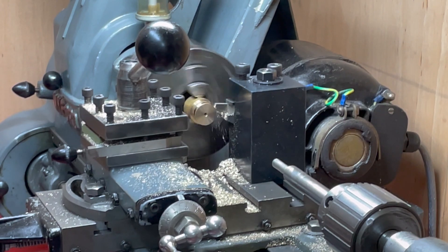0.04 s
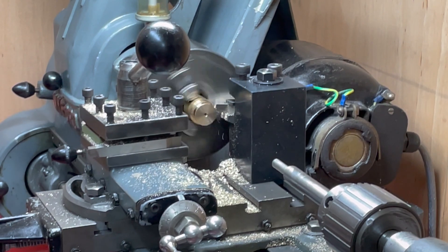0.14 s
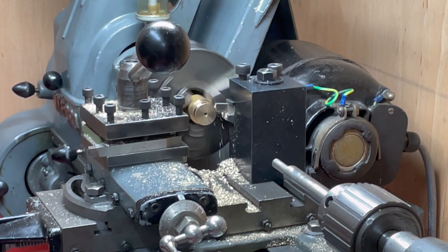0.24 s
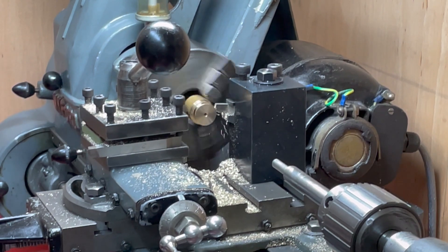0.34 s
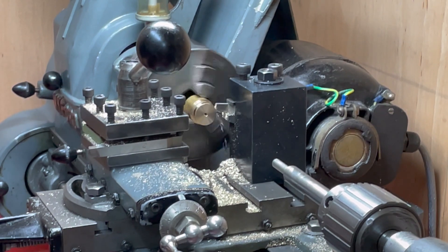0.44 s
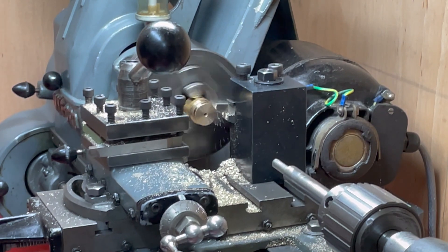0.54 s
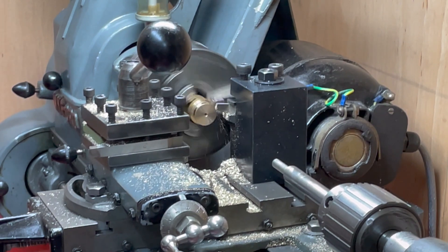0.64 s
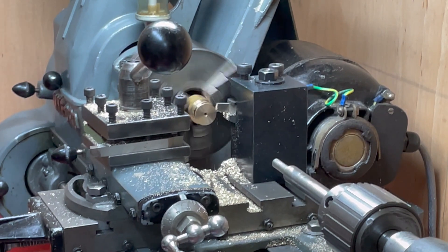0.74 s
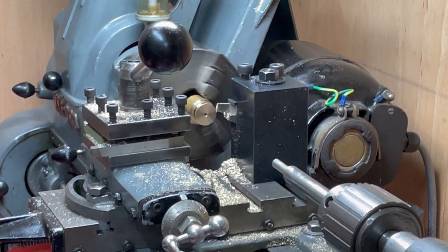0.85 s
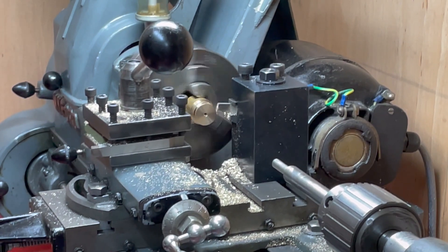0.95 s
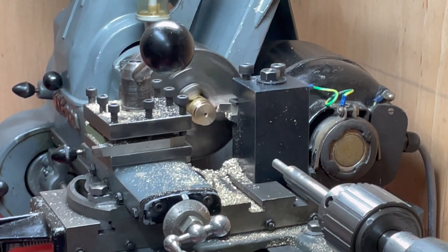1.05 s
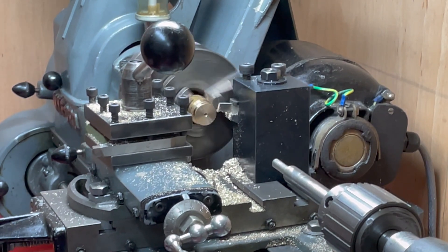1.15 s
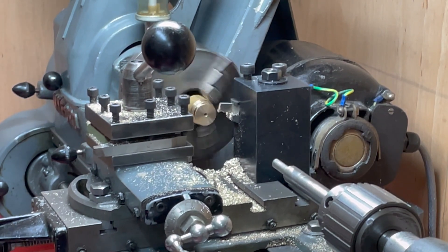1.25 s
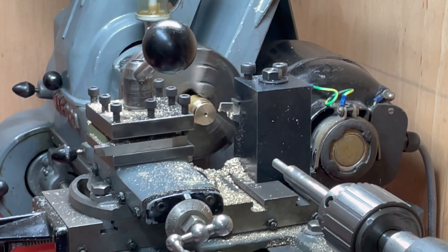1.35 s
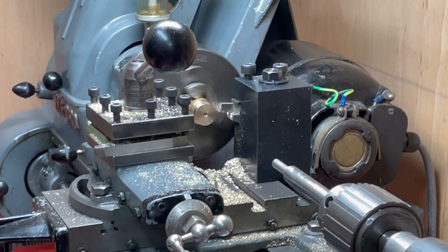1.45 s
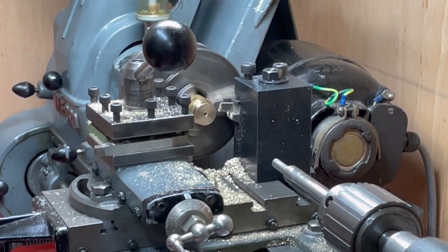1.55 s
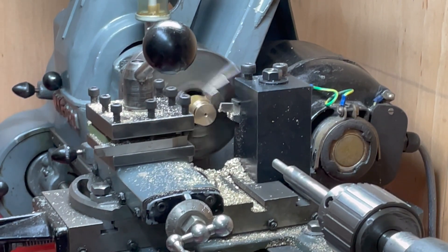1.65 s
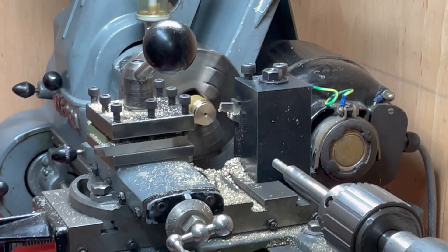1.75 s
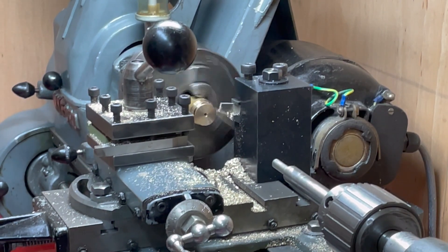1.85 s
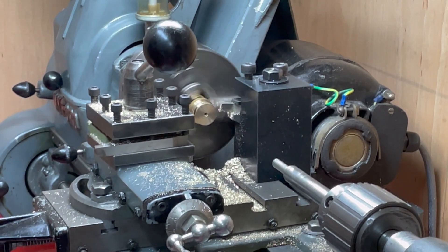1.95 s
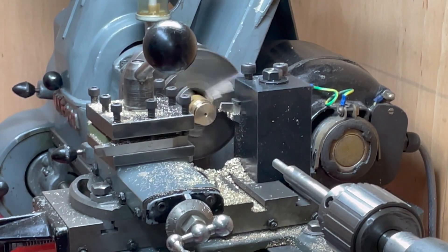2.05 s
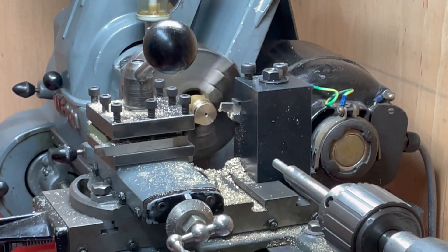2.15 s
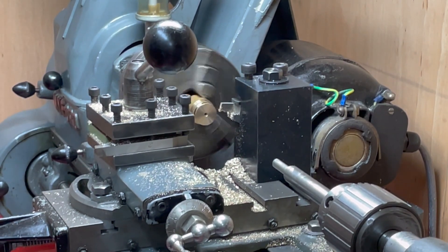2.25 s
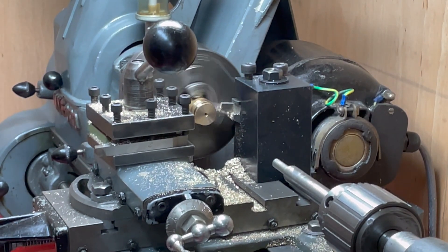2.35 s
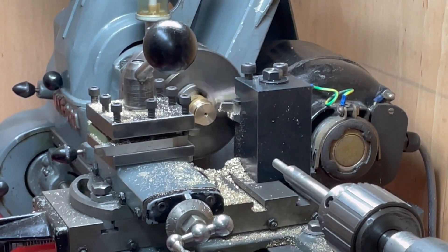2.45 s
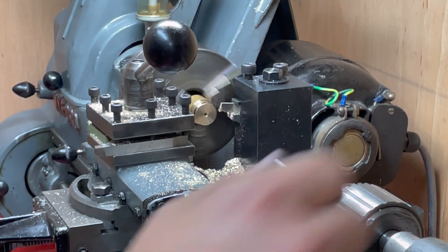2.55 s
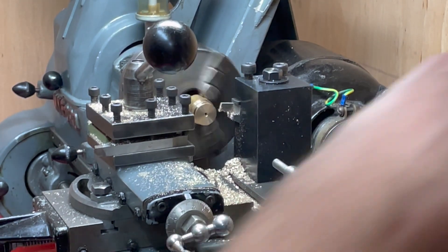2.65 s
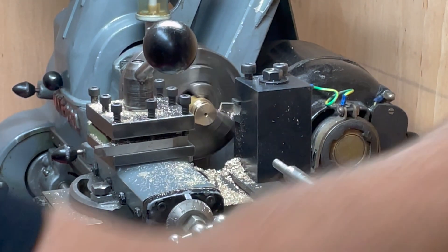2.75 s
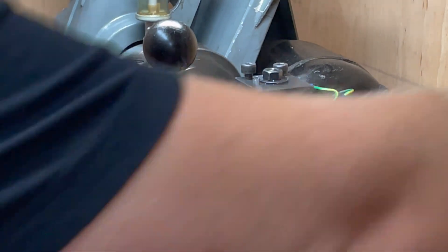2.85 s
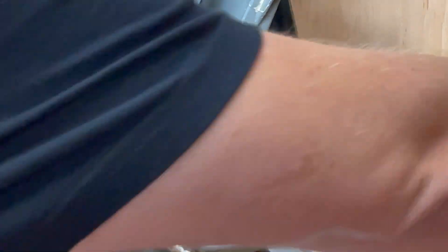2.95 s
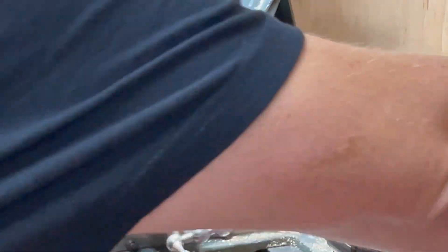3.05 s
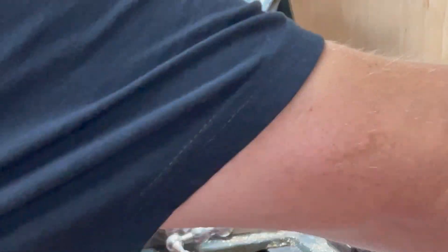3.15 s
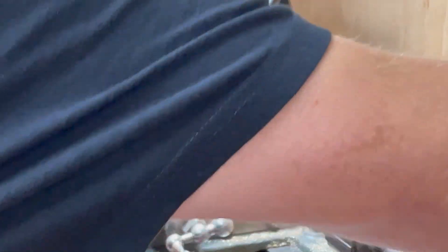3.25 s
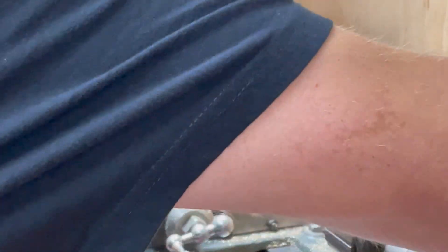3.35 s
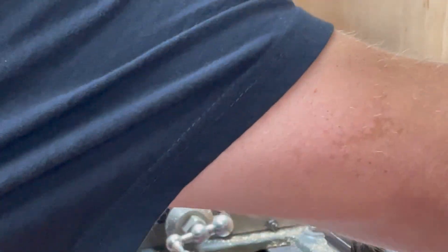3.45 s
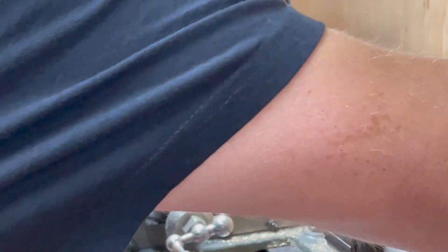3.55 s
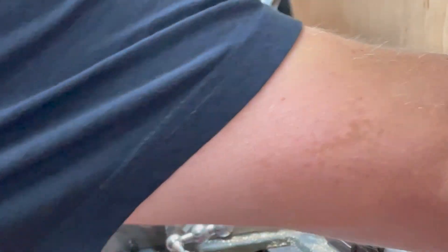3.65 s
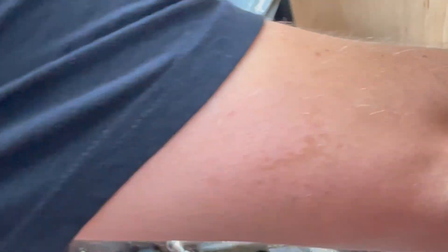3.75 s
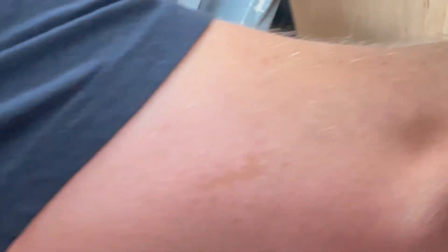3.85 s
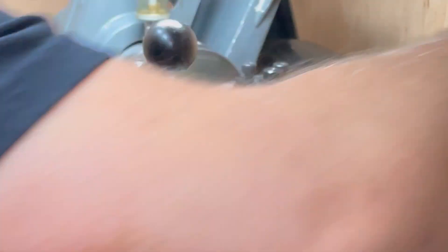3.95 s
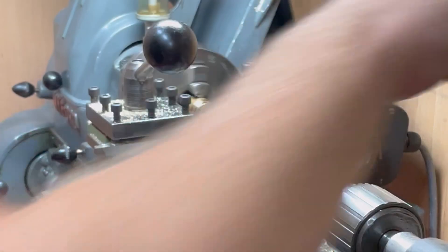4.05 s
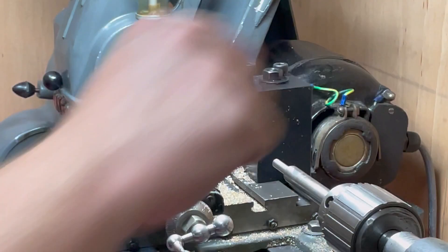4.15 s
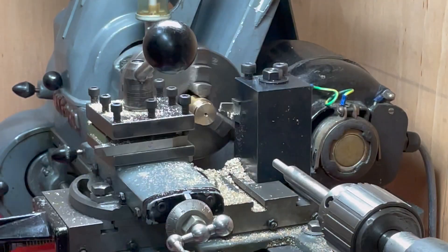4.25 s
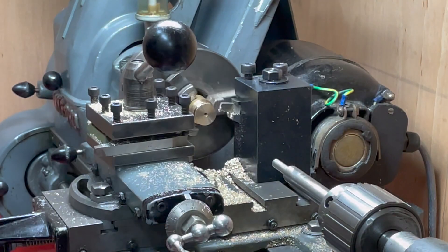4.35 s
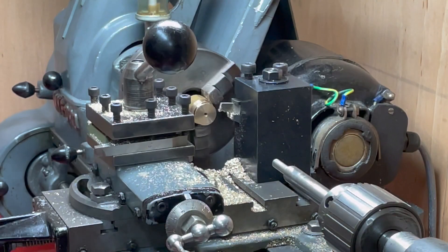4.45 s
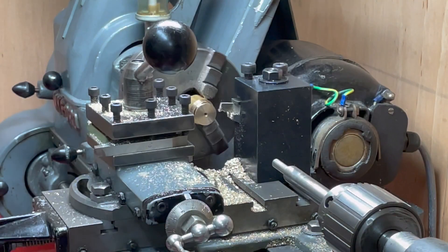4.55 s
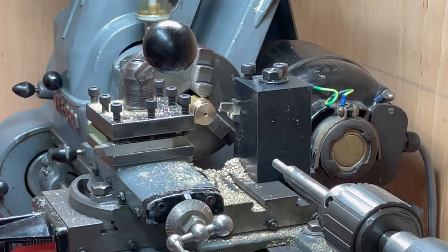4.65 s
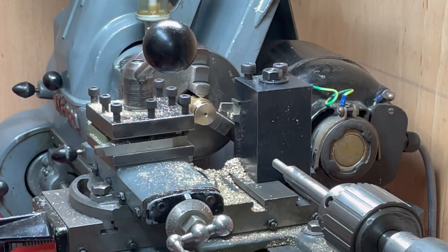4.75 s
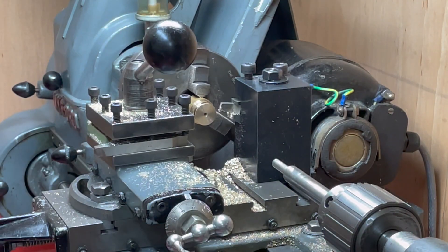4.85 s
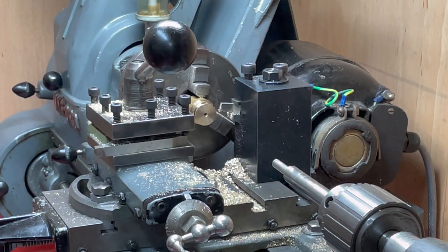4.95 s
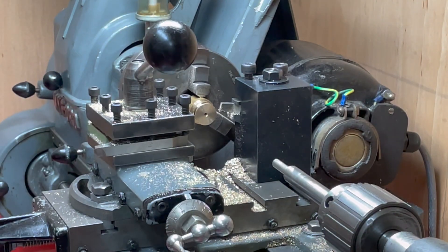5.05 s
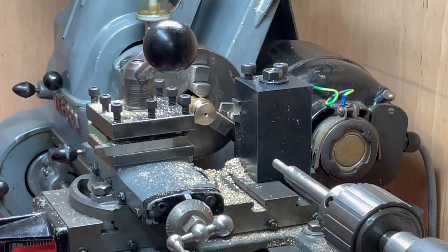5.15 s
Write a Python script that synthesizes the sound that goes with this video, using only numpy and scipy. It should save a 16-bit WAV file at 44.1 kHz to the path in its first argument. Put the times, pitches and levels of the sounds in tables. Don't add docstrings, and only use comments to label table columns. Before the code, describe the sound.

A small metal lathe hums and rattles with a slapping belt, snaps off at a loud switch, then its spindle coasts down with rumble and clicks.

```python
import sys
import numpy as np
from scipy import signal
from scipy.fft import rfft, irfft, next_fast_len
from scipy.io import wavfile
from scipy.ndimage import uniform_filter1d

SR = 44100
rng = np.random.default_rng(int(sys.argv[2]) if len(sys.argv) > 2 else 0)


def file_out(sig):
    cols = np.atleast_2d(sig).T
    lim = np.clip(cols, -1, 1)
    pcm = np.round(lim * 32767).astype(np.int16)
    wavfile.write(sys.argv[1], SR, pcm)


def attenuation_scalar(level_db):
    decades = np.asarray(level_db, float) / 20
    return 10 ** decades


N = 228702
M = next_fast_len(N, True)
T = np.arange(N) / SR
FREQ = np.fft.rfftfreq(M, 1 / SR)
LOG_FREQ = np.log(FREQ + 1)
OFF_S, SHAFT_HZ = 3.378, 24.82


def read(table):
    s, *columns = np.vstack(table).T
    return [np.interp(T, s, c) for c in columns]


def gate(start_s, end_s, fade_s=0.019):
    return np.clip(np.minimum(T - start_s, end_s - T) / fade_s + 0.5, 0, 1)


def along(table):
    hz, value = np.transpose(table)
    return np.interp(LOG_FREQ, np.log(hz + 1), value)


def colour(x, gain):
    return irfft(rfft(x, M) * gain, M)[:N]


def band(x, lo_hz, hi_hz):
    return signal.sosfilt(signal.butter(3, [lo_hz, hi_hz], "bandpass", fs=SR, output="sos"), x)


def walk(rate_hz):
    k = int(SR / rate_hz)
    held = np.repeat(rng.standard_normal(N // k + 1), k)
    return 2.0 * uniform_filter1d(uniform_filter1d(held, k), k)[:N]


def hiss(table, ref_hz, flicker_db=1.0, grain_db=1.5):
    grains = rng.standard_normal(M) * attenuation_scalar(grain_db * rng.exponential(size=M))
    spectrum = rfft(grains) * attenuation_scalar(along(table))
    inside = (FREQ > ref_hz[0]) & (FREQ < ref_hz[1])
    spectrum /= np.sqrt(2 * np.sum(abs(spectrum[inside]) ** 2)) / M
    if not flicker_db:
        return irfft(spectrum, M)[:N]
    part = np.clip(np.log(FREQ / 150 + 1e-9) / np.log(3), 0, 4)
    out = np.zeros(N)
    for k in range(5):
        share = np.clip(1 - abs(part - k), 0, 1)
        out += irfft(spectrum * share, M)[:N] * attenuation_scalar(flicker_db * walk(14))
    return out


def narrow(peaks):
    shape = 0
    for hz, width_hz, db in peaks:
        height = attenuation_scalar(db) / np.sqrt(width_hz * np.pi / 2 / SR)
        shape = shape + height / (1 + ((FREQ - hz) / width_hz * 2) ** 2)
    return colour(rng.standard_normal(N), shape)


def add(out, s, x):
    i = int(s * SR)
    out[i:i + len(x)] += x[:N - i]


def ring(modes, rise_s=0.00027, luck_db=2.5):
    hz, db, t60 = np.transpose(modes)
    t = T[:min(int(t60.max() * SR), SR // 5), None]
    luck = rng.standard_normal((2, len(hz)))
    pitch = hz * (1 + 0.0044 * luck_db * luck[1])
    x = (attenuation_scalar(db + luck_db * luck[0] - 60 * t / t60) * np.sin(2 * np.pi * pitch * t)).sum(1)
    x *= np.minimum(t[:, 0] / rise_s, 1)
    return np.pad(x / abs(x).max(), (0, SR // 5 - len(x)))


def burst(noise, s, t60_s, rise_s=0.00043):
    t = T[:SR // 5]
    i = int(s * SR * 0.9)
    return noise[i:i + len(t)] * attenuation_scalar(-60 * t / t60_s) * np.minimum(t / rise_s, 1)


def strokes(table, rise_db_per_s, fall_db_per_s):
    gain = 0
    for s, length, db, sag in table:
        rise = rise_db_per_s * np.maximum(s - T, 0)
        hold = sag * np.clip(T - s, 0, length)
        fall = fall_db_per_s * np.maximum(T - s - length, 0)
        gain = gain + attenuation_scalar(db - rise - hold - fall)
    return gain


def echo(x, t60_s):
    t = T[:int(0.4 * SR)]
    tail = rng.standard_normal(len(t)) * attenuation_scalar(-60 * t / t60_s) * np.minimum(t / 0.00056, 1)
    return signal.fftconvolve(x, tail / np.sqrt(np.sum(tail ** 2)))[:N]


# offset/Hz, level under hum/dB, in-step t/s
HUM_BEATS = [(-6.41, -25, 1.687), (-6.01, -27, 1.751), (-4.03, -18.5, 1.668), (-.38, -21, 2.033),
             (.35, -20, 1.146), (1.76, -16, 1.655), (2.24, -25, 1.788), (3.9, -24, 1.805),
             (5.72, -16.5, 1.696), (6.4, -23, 1.734)]
# f/Hz, width/Hz, level/dB
BENCH_BANDS = [(33, 11, -48.5), (134.9, 9.9, -47.5), (250, 114, -48.5)]
# f/Hz, level/dB
FRAME_TONES = [(55.2, -37.5), (74.8, -45), (125.3, -47.5)]


def hum():
    hum_hz, hum_db = 99.98, -22.2
    drop_db, drop_s, fade_db_per_s, frame_t60_s = -8.5, 0.014, 43.5, 1.1
    after = np.maximum(T - OFF_S, 0)
    db = hum_db + drop_db * np.minimum(after / drop_s, 1) - fade_db_per_s * after
    neighbours = sum(attenuation_scalar(under_db) * np.exp(2j * np.pi * offset_hz * (T - s))
                     for offset_hz, under_db, s in HUM_BEATS)
    beats = 1 + gate(-1, OFF_S) * neighbours
    swell = 1 + 0.09 * (1 + 0.5 * walk(5.4)) * np.cos(2 * np.pi * SHAFT_HZ * T - 1.13)
    tone = np.sqrt(2) * attenuation_scalar(db) * swell * (beats * np.exp(2j * np.pi * hum_hz * (T - 1 / 500))).imag
    bench = narrow(BENCH_BANDS)
    for hz, frame_db in FRAME_TONES:
        level = attenuation_scalar(frame_db + 0.5 + 1.3 * walk(4))
        bench += level * np.sin(2 * np.pi * hz * T + 0.45 * walk(3.91))
    return tone + bench * attenuation_scalar(-60 * after / frame_t60_s)


# f/Hz, level/dB per Hz
WHIRR_COLOUR = [(25, -37), (60, -14), (130, -16.5), (180, -30.5), (350, -32.5), (815, -29.5), (1870, -41),
                (3000, -41.5), (5440, -49), (7500, -52.5), (9900, -60), (13000, -74), (16000, -70.5)]
# f/Hz, width/Hz, level/dB
WHINE_BANDS = [(576, 28, -51.5), (619, 11, -57.5), (729.5, 15, -50), (803.3, 22, -46.5), (1650, 35, -69),
               (3040, 30, -58), (3210, 36, -68.5)]
# t/s, length/s, level/dB, sag/dB per s
BODY_LEAN = [
    (2.75, 0.35, -45.5, -2),
]
# f/Hz, level/dB
SLOT_TONES = [(1491.4, -51), (4366.5, -61.5), (5459.5, -57.5)]
# t/s, rattle level/dB
BEARING_PLAY = [(0, -31.5), (.3, -31.5), (.75, -33), (1.0, -32), (1.3, -29.5), (1.6, -30.5), (1.85, -33.5),
                (2.1, -36.5), (2.6, -29.5), (2.9, -36), (3.1, -28.5), (3.3, -35)]
# f/Hz, level/dB, t60/s
RATTLE_MODES = [(2233, 3.5, 0.02), (3070, 1.5, 0.033), (3373, -2.5, 0.062), (3900, 6.5, 0.016),
                (4562, -2, 0.07), (5300, -10, 0.072)]


def motor():
    out = attenuation_scalar(-40.5) * hiss(WHIRR_COLOUR, (300, 1800)) + narrow(WHINE_BANDS)
    out += strokes(BODY_LEAN, 60, 90) * narrow([(753, 30, 0.003)])
    for hz, tone_db in SLOT_TONES:
        out += attenuation_scalar(tone_db + 5.0 + 1.6 * walk(25)) * np.sin(2 * np.pi * hz * T + 0.83 * walk(30))
    scratch = hiss([(1500, -20.0), (3000, 8.5), (5500, 1.0), (9000, -30.0)], (2000, 7000), 0, 0)
    for s in np.arange(0.0235, OFF_S, 1 / SHAFT_HZ):
        db = np.interp(s, *np.transpose(BEARING_PLAY)) + 0.9 * rng.standard_normal()
        rattle = attenuation_scalar(-0.5) * ring(RATTLE_MODES, 0.0014, 2.2)
        rattle += attenuation_scalar(-6.5) * burst(scratch, s, 0.034, 0.0049)
        add(out, s, attenuation_scalar(db) * rattle)
    return out * gate(-1, OFF_S + 0.022, 0.06)


# f/Hz, level/dB
FRIDGE_TONES = [(1200, -76.5), (1299, -66.5)]
# f/Hz, level/dB per Hz
SHOP_COLOUR = [(30, -12), (60, 5), (150, -10.5), (400, -16.5), (1500, -38), (6000, -36.5), (13000, -48.5)]


def workshop():
    fridge = sum(np.sqrt(2) * attenuation_scalar(db) * np.sin(2 * np.pi * hz * T) for hz, db in FRIDGE_TONES)
    return fridge + attenuation_scalar(-65.5) * hiss(SHOP_COLOUR, (300, 1800), 0)


# t/s, length/s, level/dB
CHATTER = [
    (0, 0.014, -41.5),
    (0.152, 0.06, -38.5),
    (0.235, 0.13, -44.5),
    (.41, .04, -44),
    (0.462, 0.057, -40.5),
    (0.523, 0.036, -37),
    (0.598, .02, -54),
    (0.638, 0.022, -33),
]
# f/Hz, width/Hz, level/dB
SQUEAL_BANDS = [(5960, 660, 0), (12050, 440, -17)]
# f/Hz, level/dB per Hz
CHIP_COLOUR = [(900, -7.5), (1700, -10), (6000, -19.5), (8000, -12.5), (9500, -24), (13600, -21),
               (14300, -23), (16000, -45.5)]


def cut():
    end_s, hiss_db, bite_db_per_s = 0.725, -56, 6.5
    squeal_rest_db, squeal_hz, wander_hz, core_db = -52, 5900, 69.4, -7.5
    chatter = attenuation_scalar(squeal_rest_db) + strokes([row + (0,) for row in map(tuple, CHATTER)], 340, 360)
    core = np.sin(2 * np.pi * np.cumsum(squeal_hz + wander_hz * walk(35)) / SR)
    squeal = attenuation_scalar(-4.0) * narrow(SQUEAL_BANDS) + attenuation_scalar(core_db) * core
    squeal *= chatter * attenuation_scalar(-3.0 + 1.4 * walk(68.0))
    bite = attenuation_scalar(hiss_db + bite_db_per_s * np.minimum(T, end_s))
    return (bite * hiss(CHIP_COLOUR, (9500, 13500)) + squeal) * gate(-1, end_s - 0.025, 0.022)


# t/s, peak level/dB, brightness/dB, ring tilt/dB per octave, panel clang/dB
BELT_STRIKES = [(0.0646, -22, -2.5, 5, -5), (0.2219, -19.5, -10.5, -0.5, -1), (0.38, -25, -14.5, -4, .1),
                (0.5365, -20, -9, 0, -5), (0.6915, -20.5, -5.5, -1, -1), (0.8472, -27, -22, 2, 2),
                (1.004, -19, -8.5, 7, -4), (1.161, -21.5, -10, 1, 2), (1.318, -32, -4, 0., .1),
                (1.4741, -20, -9, 2.5, -2.5), (1.6332, -27.5, -8, -11, 7), (1.7863, -26.5, -7, 5, -3),
                (1.943, -18.5, -6.5, -0.5, 0.5), (2.0969, -27.5, -6, -13, 2),
                (2.2537, -18.5, -10, 5.5, -0.5), (2.412, -19, -8.5, 0.5, 0), (2.56, -28.5, -5, -11, -9),
                (2.727, -25.5, -4, 1, -6), (2.882, -25.5, -10, -7, 0), (3.037, -27.5, -8, -14, 2),
                (3.1938, -20.5, -9.5, 0.5, 0.5), (3.352, -24.5, -8, 0, 3.5), (3.5218, -37.5, -8.5, 2, -0.5)]
# f/Hz, level/dB, t60/s
GUARD_MODES = [(795, -18, .04), (925, -1, 0.059), (1126, 5, 0.083), (1349, -3.5, 0.062),
               (1505, -1.5, 0.058), (1870, -3.5, 0.012), (2283, -7, 0.11), (2670, -2.5, 0.031),
               (3442, -6.5, 0.042)]
# f/Hz, level/dB per Hz
CRACK_COLOUR = [(400, -46), (700, -9), (1100, -6.5), (2600, -9.5), (3000, -22), (3400, -13.5), (4500, -22),
                (7000, -18), (15000, -54)]
# delay/s, level/dB
JOINT_BOUNCES = [
    (.004, -2.5),
    (.0095, -12),
    (.016, -17),
    (.028, -32),
]


def belt():
    mask_db, clang_hz = -30.5, 1124
    out, crack = np.zeros(N), hiss(CRACK_COLOUR, (2000, 6000), 0, 2.5)
    for s, peak_db, bright_db, tilt_db, clang_db in BELT_STRIKES:
        under = attenuation_scalar(mask_db) ** 2 * (s < OFF_S)
        size = np.sqrt(max(attenuation_scalar(peak_db) ** 2 - under, 1e-4 * attenuation_scalar(1)))
        modes = []
        for hz, db, t60 in GUARD_MODES:
            clang = clang_db * (abs(hz / clang_hz - 1) < 0.1)
            modes.append((hz, db + tilt_db * np.log2(hz / 1500) + clang, t60))
        hit = attenuation_scalar(-2.5) * ring(modes, 0.00093, 2.1)
        hit += attenuation_scalar(bright_db) * burst(crack, s, 0.077, 0.00099)
        add(out, s, size * hit)
        lucks = rng.uniform(0.8, 1.2, len(JOINT_BOUNCES))
        for (later_s, db), luck in zip(JOINT_BOUNCES, lucks):
            add(out, s + later_s * luck, size * attenuation_scalar(db) * ring(modes, 0.00099, 1.2))
    return out


# t/s, peak level/dB
DULL_TAPS = [(0.345, -28.5), (0.595, -22), (0.772, -26.5), (1.7853, -31), (3.522, -38), (3.9, -37.5),
             (4.021, -22.5), (4.385, -35), (4.2228, -29.5), (4.8378, -50), (4.947, -27), (5.1433, -32.5)]


def taps():
    out = np.zeros(N)
    dull = hiss([(300, -5), (2000, 0.0), (6000, -5.5), (9000, -18.5)], (1500, 6500), 0, 0)
    for s, db in DULL_TAPS:
        add(out, s, attenuation_scalar(db - 13.5) * burst(dull, s, 0.06))
    return out


# t/s, length/s, level/dB, sag/dB per s
HAND_STROKES = [
    (.53, 0.13, -45, 11),
    (2.5, 0.41, -43, -5.5),
]


def hand():
    table = [(1000, -20.0), (2200, 5.0), (4200, 1.0), (6000, -5.5), (8000, -21.5)]
    return strokes(HAND_STROKES, 150, 130) * hiss(table, (2500, 5500), 0.65, 1.8)


# t/s, peak level/dB, f/Hz, t60/s
DULL_KNOCKS = [(0.691, -32.5, 312.5, 0.39), (1.545, -32.5, 263, 0.066), (1.569, -28.5, 258, 0.05),
               (1.785, -25, 215, 0.035), (1.805, -19.5, 268.7, 0.1), (1.834, -30, 288, 0.072),
               (4.836, -35, 372, 0.035), (4.85, -28, 250, 0.034), (4.866, -26.5, 254, 0.17),
               (4.893, -40, 220, 0.052), (4.907, -28.5, 275, 0.04), (4.919, -30.5, 250, 0.064),
               (4.946, -35, 263, 0.056), (5.065, -49.5, 316, 0.079)]


def knocks():
    out = np.zeros(N)
    for s, db, hz, t60 in DULL_KNOCKS:
        modes = [(hz, 0, t60), (hz * 1.6, -10, t60 * 0.47), (hz * 0.61, -6, t60)]
        add(out, s, attenuation_scalar(db + 1.7) * ring(modes, 0.0029))
    return out


# t/s, peak level/dB
BRIGHT_TICKS = [(0.714, -42), (0.835, -44), (0.987, -50), (1.1433, -53), (1.307, -45.5), (1.4564, -45),
                (1.5205, -56), (1.6154, -46), (1.7705, -46), (1.9251, -43.5), (2.0867, -42), (2.2453, -43),
                (2.396, -41), (3.0213, -45.5), (3.1217, -49), (3.175, -47), (4.2225, -55)]
# f/Hz, level/dB per Hz
SWARF_COLOUR = [(1500, -13), (4000, 1), (8000, 11.5), (11000, 0.5), (13500, -5.5), (14500, -19),
                (16000, -29)]


def ticks():
    out, noise = np.zeros(N), hiss(SWARF_COLOUR, (9500, 14000), 0, 1.8)
    for s, db in BRIGHT_TICKS:
        add(out, s, attenuation_scalar(db - 3.0) * burst(noise, s, 0.016))
    return out


# f/Hz, level/dB per Hz
CLOTH_COLOUR = [(700, -16), (1700, -9), (4500, -7.5), (6900, -10), (9000, -7.5), (11300, -16.5),
                (13800, -22), (16000, -29.5)]
# t/s, length/s, level/dB, sag/dB per s
SLEEVE_STROKES = [
    (1.5, 0.11, -67, 3),
    (2.47, 0.14, -52, 7),
    (2.65, 0.26, -59, 21),
    (3.16, 0.031, -69, 8),
]
# t/s, length/s, level/dB, sag/dB per s
SOLE_GRIT = [
    (4.834, .07, -61, 32),
    (4.947, .02, -67, 57),
    (5.12, .1, -62.5, -62.5),
]


def rustle():
    air = attenuation_scalar(-68 + 0.67 * read(COAST_DRAG)[0]) * gate(0.99, 9, 0.03)
    gain = air + strokes(SLEEVE_STROKES, 190, 160) + strokes(SOLE_GRIT, 5000, 360)
    return gain * hiss(CLOTH_COLOUR, (9500, 13500), 1.5, 1.7)


# f/Hz, level/dB, t60/s
LEVER_MODES = [(5960, -4, 0.042), (1216, -3.5, 0.023)]
# t/s, peak level/dB
SWITCH_SNAPS = [
    (3.3766, -.5),
    (4.0297, -6.5),
]
# f/Hz, level/dB, t60/s
SWITCH_MODES = [
    [(250, -15, 0.069), (473, -17.5, 0.17), (1660, -12, 0.035), (2960, -0.5, 0.015), (3150, -15, 0.075),
     (3440, -25, 0.07), (4706, 10, 0.013), (3600, -16, .08), (5330, -14.5, .09), (6130, -8, 0.017),
     (4540, -17, 0.07), (5610, 1.5, 0.025), (6030, -11, 0.011), (11100, -16, 0.012)],
    [(520, -20, 0.11), (2286, -15, .04), (3250, -15.5, 0.021), (6650, 0.5, 0.013), (9900, -11.5, 0.0083),
     (10820, 3, 0.014), (12520, 0, 0.011)],
]
# f/Hz, level/dB per Hz
SWITCH_COLOURS = [
    [(100, -28), (250, -9), (1000, -23.5), (1700, -13), (2500, -18.5), (3100, -6.5), (4000, -12.5),
     (5000, -6.5), (7500, -14.5), (11000, -14.5), (14000, -24.5), (16000, -19.5)],
    [(200, -44), (560, -17.5), (1900, -18.5), (4200, -11.5), (6800, -1), (8500, 2), (11000, 0),
     (14000, -11.5), (16000, -8)],
]
# (f/Hz, level/dB, t60/s)
CONTACT_REBOUNDS = [
    (3.3814, -15.5, [(4800, 2, 0.0079), (6100, -6, 0.011), (1730, -15, .02)]),
    (3.3865, -20.5, [(3250, -1.5, 0.013), (5760, -5, .012)]),
]


def switches():
    rise_s, tail_s = 0.0012, 0.13
    out = np.zeros(N)
    add(out, 3.3703, attenuation_scalar(-22.5) * ring(LEVER_MODES, 0.0019))
    for (s, db), modes, table in zip(SWITCH_SNAPS, SWITCH_MODES, SWITCH_COLOURS):
        noise = hiss(table, (3000, 13000), 0, 0)
        add(out, s, attenuation_scalar(db - 5.0) * ring(modes, rise_s, 0))
        add(out, s, attenuation_scalar(db - 7.5) * burst(noise, s, 0.026, rise_s))
        add(out, s, attenuation_scalar(db - 16.0) * burst(noise, s - 1, tail_s, 0.0019))
    for s, db, modes in CONTACT_REBOUNDS:
        add(out, s, attenuation_scalar(db) * ring(modes, 0.00052, 0))
    return out


# t/s, level/dB
COAST_DRAG = [(3.5, -2), (3.63, -0.5), (3.97, 4.5), (4.13, -1), (4.38, 4), (4.47, -1.5), (4.6, -9),
              (4.81, -19), (5.02, -15.5)]
# f/Hz, level/dB per Hz
SPINDLE_COLOUR = [(20, -32.5), (50, -4), (110, -22), (240, -18), (400, -18.5), (650, -22.5), (900, -25),
                  (1350, -28.5), (2200, -27), (3000, -32.5), (7000, -39.5), (12000, -47.5)]
# f/Hz, width/Hz, level/dB
SPINDLE_RINGS = [(369, 64, 0), (2190, 220, 0.6)]
# f/Hz, width/Hz, level/dB
BEARING_BANDS = [(1750, 90, -9.5), (1960, 80, -8.5), (2960, 160, -9), (3280, 300, -11), (4750, 870, -4),
                 (6740, 270, -12.5)]


def coast():
    drag_db = read(COAST_DRAG)[0]
    low_db = -51.5 + 0.67 * drag_db
    high_db = -55.5 + 1.15 * drag_db
    ring_db = -56.5 + 0.94 * drag_db
    noise = hiss(SPINDLE_COLOUR, (300, 600), 1.7, 3.1)
    low = colour(noise, 1 / (1 + (FREQ / 900) ** 4))
    high = (noise - low) / np.std(band(noise, 2530, 6200))
    for peak in BEARING_BANDS:
        high = high + attenuation_scalar(0.5 + 1.5 * walk(7.4)) * narrow([peak])
    low_ring, high_ring = (attenuation_scalar(1.2 * walk(70) + 0.66 * walk(10)) * narrow([peak])
                           for peak in SPINDLE_RINGS)
    out = attenuation_scalar(low_db - 4.0) * (low + low_ring) + attenuation_scalar(high_db - 2.5) * high
    out += attenuation_scalar(ring_db) * high_ring * gate(3.525, 9, 0.03)
    return out * gate(3.42, 9, 0.06)


# t/s, peak level/dB, t60/s
GRIT_CRACKS = [
    (4.8335, -50, .01),
    (4.868, -45, .01),
    (4.905, -45.5, 0.01),
    (4.925, -47, .01),
    (4.9461, -33, .008),
    (5.145, -36, .012),
]


def cracks():
    out = np.zeros(N)
    table = [(1500, -9), (3500, -3), (7000, 3.0), (12000, -9), (14500, -19.5)]
    crisp = hiss(table, (3500, 12000), 0, 0)
    for s, db, t60 in GRIT_CRACKS:
        add(out, s, attenuation_scalar(db) * burst(crisp, s, t60, 0.0002))
    return out


# t/s, length/s, level/dB, sag/dB per s
SCRAPES = [
    (4.835, 0.11, -49, -2),
    (4.95, 0.046, -53, 60),
    (5.122, .02, -66, -20),
    (5.143, .1, -50, -60),
]
# t/s, length/s, level/dB, sag/dB per s
BOARD_BOOM = [
    (4.845, 0.1, -37, -100),
]


def feet():
    table = [(300, 1.5), (900, -9.5), (2200, -3.0), (5000, -16.0), (8000, -17.0), (12000, -39.0)]
    scrape = strokes(SCRAPES, 5000, 400) * hiss(table, (900, 6000), 0.66, 1.9)
    return scrape + strokes(BOARD_BOOM, 700, 236) * narrow([(76.0, 37, 0.0019)])


# f/Hz, level/dB
WALL_COLOUR = [(300, -3), (3600, -1), (4800, -6.5), (5600, -4), (8000, -4), (14000, -13.5)]


def room(hits):
    return attenuation_scalar(-4.5) * colour(echo(hits, 0.27), attenuation_scalar(along(WALL_COLOUR)))


# f/Hz, level/dB
SIDE_COLOUR = [(60, -26), (200, -8), (380, -11.5), (700, -4), (1290, -6), (2000, -6.5), (2800, -43),
               (6000, -30), (15000, -18.5)]


def scatter(x):
    scattered = echo(x, 0.13)
    sway_rad = 2.5 * walk(9)
    gain = attenuation_scalar(along(SIDE_COLOUR))
    return np.cos(sway_rad) * colour(scattered, gain) + np.sin(sway_rad) * colour(scattered, 1j * gain)


def scene():
    hits = belt() + taps() + ticks() + switches() + cracks()
    rest = hits + room(hits) + motor() + workshop() + cut()
    rest += hand() + knocks() + rustle() + coast() + feet()
    side = scatter(rest)
    return hum() + rest + np.array([side, -side])


def roll_off(x):
    return signal.sosfilt(signal.butter(12, 15950, fs=SR, output="sos"), x)


# f/Hz, level/dB
PORT_LEAN = [(60, -0.5), (110, 2), (200, -1.5), (380, 1.5), (700, 0.5), (1290, 2), (2380, 1), (4400, -0.5),
             (7000, 0.1), (8300, 1.15), (10000, 0.7), (15000, -0.5)]
# f/Hz, phase/rad
PORT_LEAD = [(1, 0), (6200, 0), (6800, -.8), (7850, -3), (8300, -3.14), (8900, -3.3), (9400, -4.4),
             (10200, -5.4), (10550, -6.28), (12700, -6.28), (13900, -9.2), (14600, -9.8), (16000, -9.95)]


def record(dry):
    turn = attenuation_scalar(along(PORT_LEAN) / 2) * np.exp(0.5j * along(PORT_LEAD))
    ports = np.array([colour(dry[0], turn), colour(dry[1], 1 / turn)])
    return roll_off(ports)


dry = scene()
out = record(dry)
file_out(out)
```